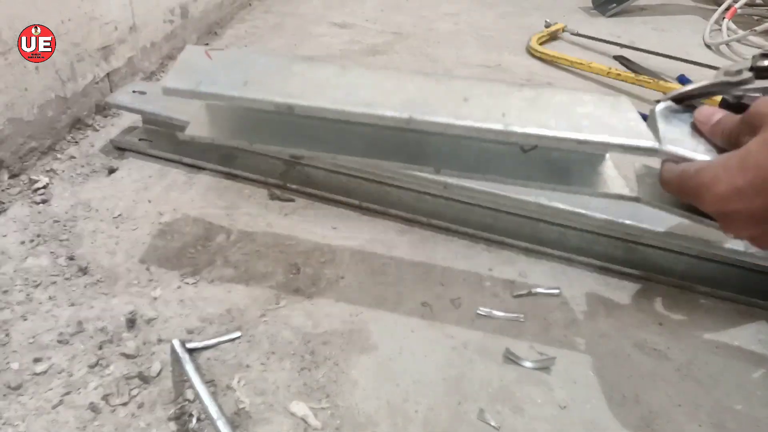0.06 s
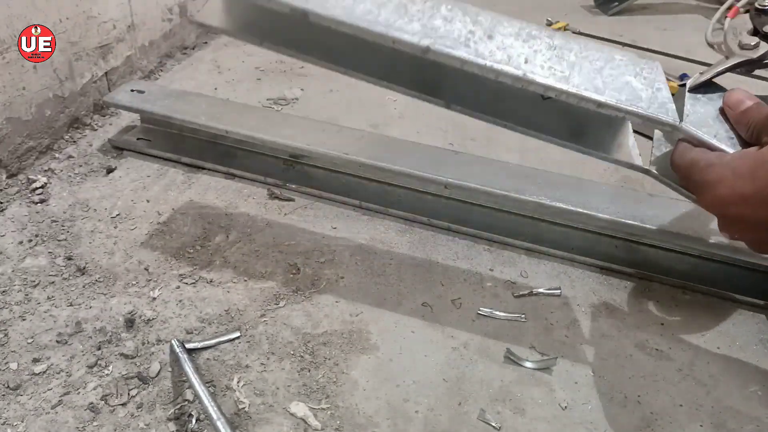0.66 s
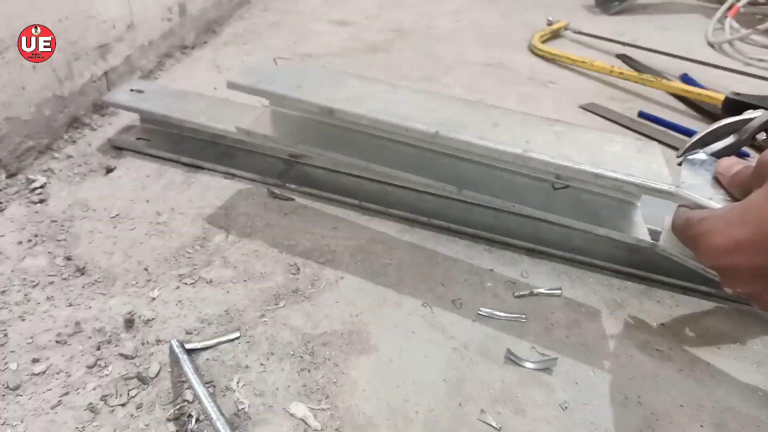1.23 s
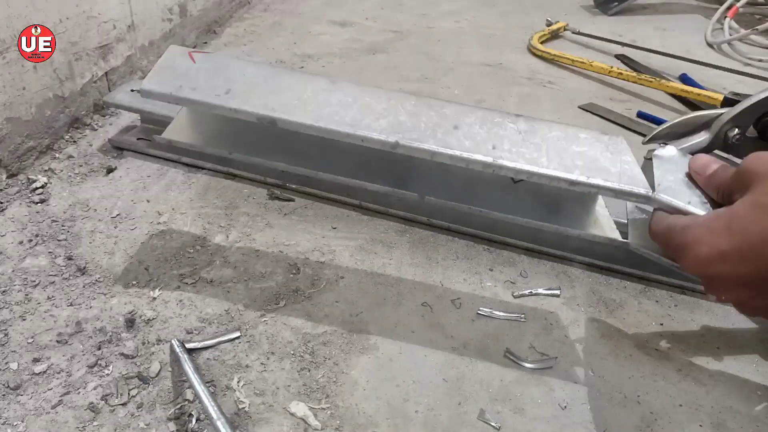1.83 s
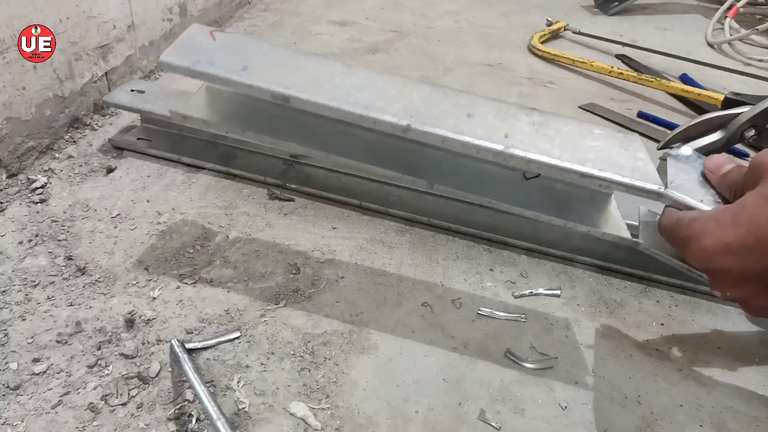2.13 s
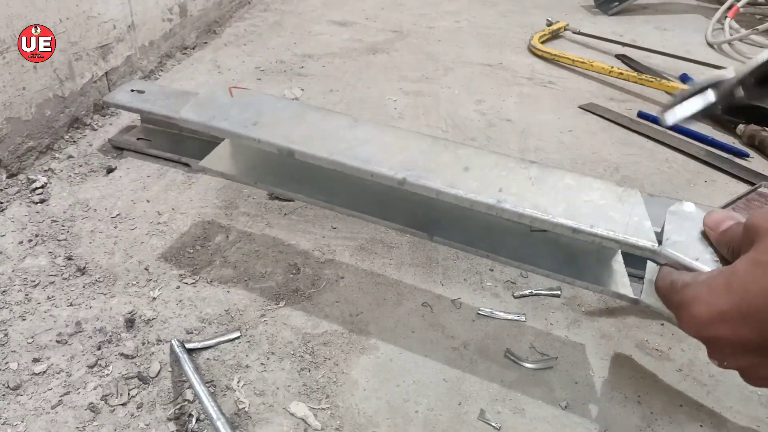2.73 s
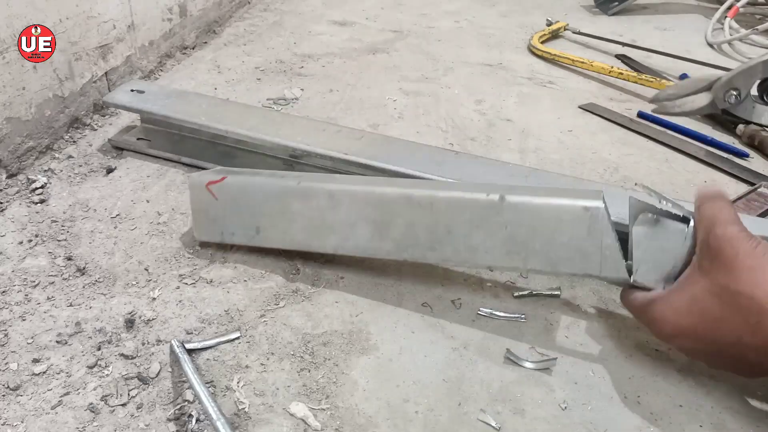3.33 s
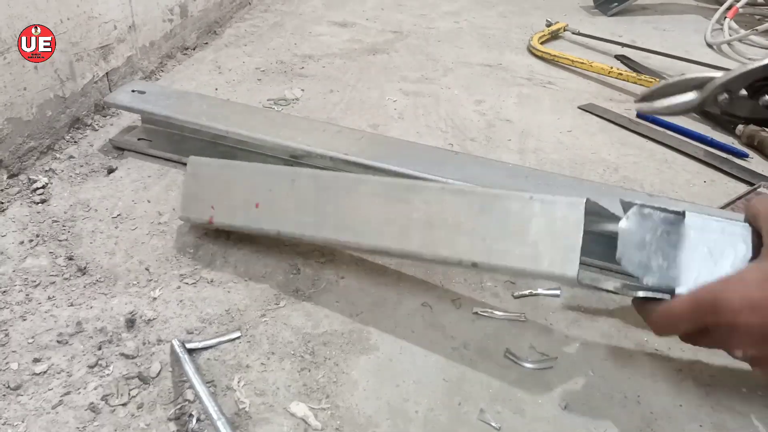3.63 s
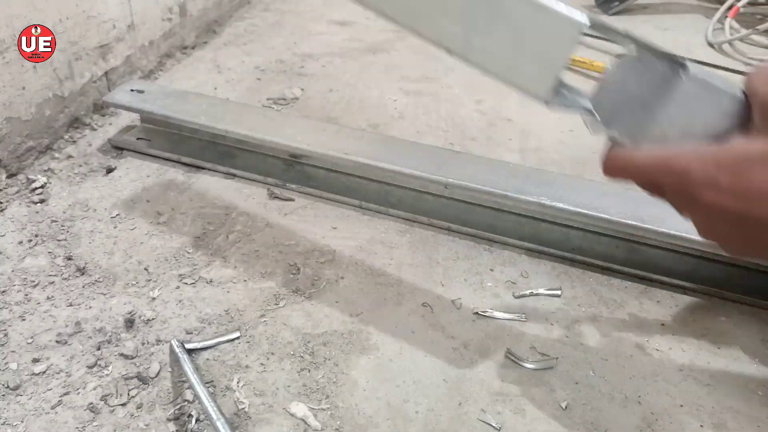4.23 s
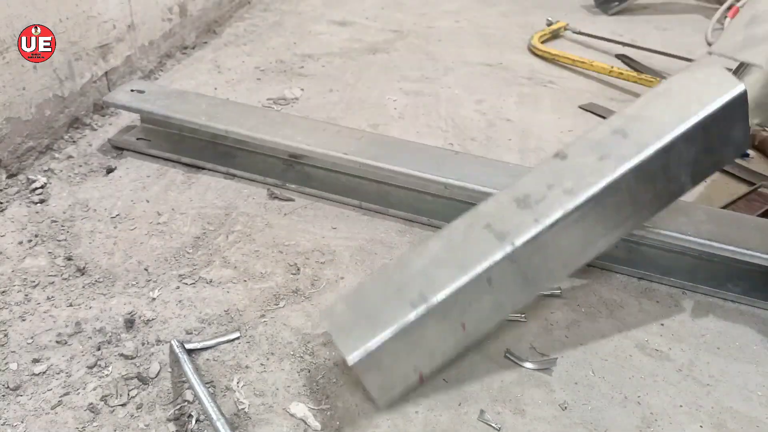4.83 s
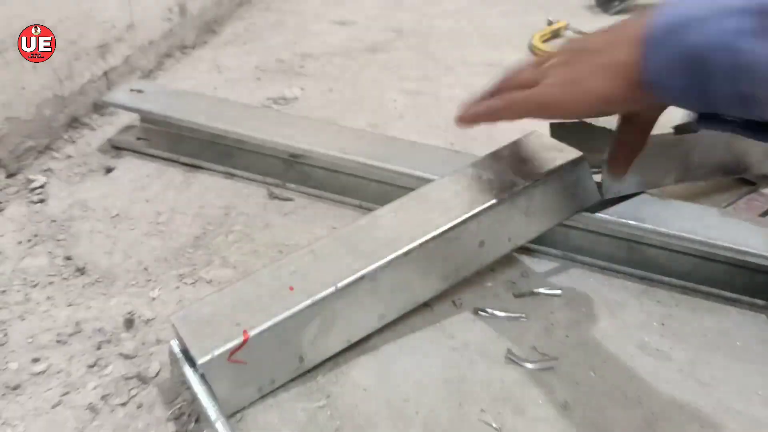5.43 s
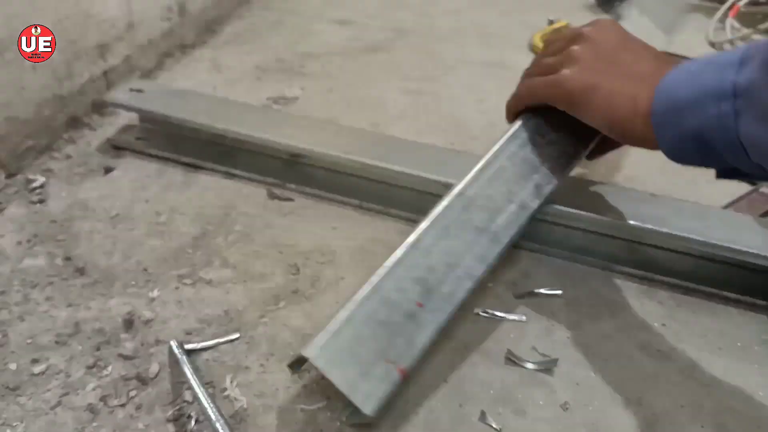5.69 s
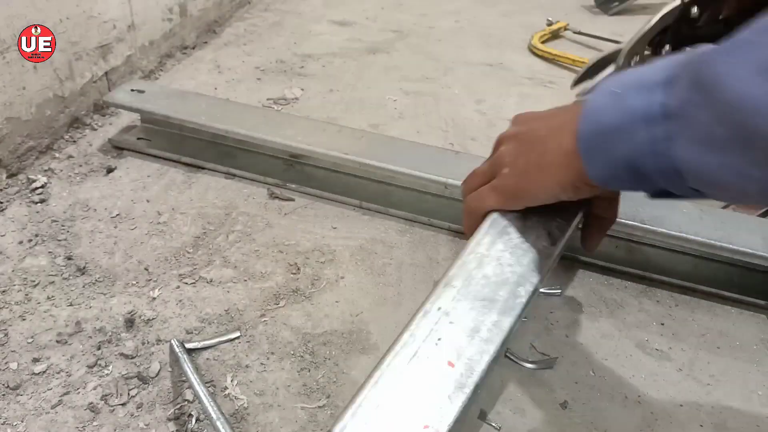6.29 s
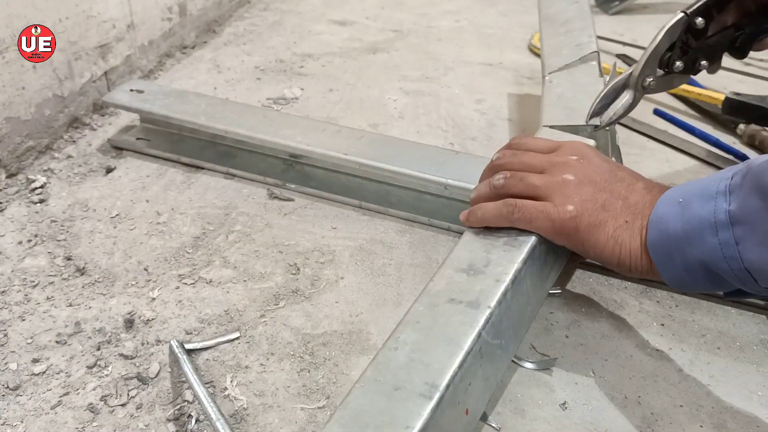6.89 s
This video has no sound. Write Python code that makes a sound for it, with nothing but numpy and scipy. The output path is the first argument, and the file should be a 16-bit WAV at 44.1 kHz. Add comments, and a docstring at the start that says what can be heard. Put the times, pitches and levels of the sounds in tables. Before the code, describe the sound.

A thin steel channel gives a few light taps, then tin snips graze, squeak and crunch into it in several squeezes, ending in a sharp snap. The snips tick faintly as they open. The channel is then turned and set down on a concrete floor with irregular ringing clanks and short gritty scrapes, busiest near the end. The microphone is close, in a bare, slightly reverberant room.

```python
"""Light metallic taps and a scrape: tin snips seek the cut on a galvanised steel channel.
The blades graze and squeal, creak by stick-slip friction and snap through the last bridge of steel.
The worker bends the cut end, turns the channel over, knocks it down and sets the snips to it again.
Each contact excites damped modes of the thin sheet or the jaws, and the bare concrete room
reverberates; a phone close by picks it up at two microphone ports."""
import sys
import numpy as np
from scipy import signal
from scipy.fft import rfft, irfft
from scipy.io import wavfile
from scipy.ndimage import map_coordinates

SR = 44100
rng = np.random.default_rng(int(sys.argv[2]) if len(sys.argv) > 2 else 0)


def to_wav(s):
    """Save 16-bit WAV."""
    ch = np.atleast_2d(s).T  # columns
    pcm = np.round(np.clip(ch, -1, 1) * 32767)  # PCM
    wavfile.write(sys.argv[1], SR, pcm.astype(np.int16))


N = 306495
TIME = np.arange(N) / SR
TAIL = np.arange(3 * 2 ** 13) / SR  # time axis of an impulse response [s]


def undb(db):
    """Amplitude ratio of a level in decibels."""
    return 10 ** (np.asarray(db) / 20)


def rms(x):
    """Root-mean-square amplitude."""
    return np.sqrt(np.mean(x ** 2)) + 1e-12


def unit(x):
    """Normalisation to unit mean energy per channel."""
    return x / (rms(x) * np.sqrt(x.shape[-1]))


def lookup(hz, points):
    """Interpolation of (frequency [Hz], value) points on a logarithmic axis."""
    f, value = np.transpose(points)
    return np.interp(np.log(np.maximum(hz, 1)), np.log(f), value)


def colour(x, points):
    """Minimum-phase filtering by a (frequency [Hz], gain [dB]) curve."""
    size = 2048
    gain = undb(lookup(np.fft.rfftfreq(size, 1 / SR), points))
    cepstrum = irfft(np.log(gain))
    cepstrum[1:size // 2] *= 2
    cepstrum[size // 2 + 1:] = 0
    return convolve(x, irfft(np.exp(rfft(cepstrum))))


def convolve(x, response):
    """Convolution with an impulse response, cut to the input length."""
    x = np.atleast_2d(x)
    return signal.fftconvolve(x, np.atleast_2d(response))[:, :x.shape[-1]]


def band(x, lo, hi):
    """Butterworth band-pass filtering."""
    return signal.sosfilt(signal.butter(N=4, Wn=[lo, hi], btype="band", fs=SR, output="sos"), x)


def resonate(x, peaks):
    """Forced response of parallel resonators of alternating sign."""
    return sum((-1) ** k * undb(db) * signal.lfilter(*signal.iirpeak(hz, hz / width, SR), x)
               for k, (hz, width, db) in enumerate(peaks))


def fade(t60):
    """Exponential decay by 60 dB in t60 seconds."""
    return np.exp(-np.log(1000) * TAIL / t60)


def add(out, s, x):
    """Superposition of x on out from time s."""
    i = max(int(s * SR), 0)
    out[..., i:i + x.shape[-1]] += x[..., :N - i]


def grains(size, rate, spread_db):
    """Shot noise: random micro-contacts of uneven strength, at a mean rate per second."""
    occurs = rng.random(size) < rate / SR
    return occurs * rng.standard_normal(size) * undb(spread_db * rng.standard_normal(size))


def flutter(rate_hz):
    """Random modulation: Gaussian values joined by straight lines."""
    knots = np.arange(0, TIME[-1] + 1, 1 / rate_hz)
    return np.interp(TIME, knots, rng.standard_normal(len(knots)))


def diffuse(size, coherent_hz=700):
    """Diffuse-field spectrum: coherence between the two ports falls with frequency."""
    hz = np.fft.rfftfreq(size, 1 / SR)
    mid, side = rfft(rng.standard_normal((2, size)))
    coherence = 0.96 / (1 + (hz / coherent_hz) ** 2)
    return hz, mid * np.sqrt(1 + coherence) + np.array([[1], [-1]]) * side * np.sqrt(1 - coherence)


def direct():
    """Direct sound: each port has its own travel time, a few samples long."""
    path = np.zeros((2, len(TAIL)))
    path[[0, 1], rng.integers(0, 16, 2)] = 1
    return path


def room(late_db, t60=0.4):
    """Late reverberation: reflections from the concrete build up, then decay exponentially."""
    reflections = rng.standard_normal((2, len(TAIL)))
    return undb(late_db) * unit(reflections * fade(t60) * (1 - fade(0.11)))


# Damping of sheet and room: (frequency [Hz], unscaled T60 [s])
DECAY_TIMES = [(100, .3), (300, .27), (700, .26), (1800, .25), (4800, .2), (12800, .17)]
def wash(t60_scale):
    """Modal overlap: dense modes merge into decaying noise, and the treble dies first."""
    hz, spectrum = diffuse(len(TAIL))
    octave = np.clip(np.log2(np.maximum(hz, 1) / 125), 0, 7)
    bands = [irfft(spectrum * np.maximum(1 - abs(octave - k), 0), len(TAIL)) for k in range(8)]
    return sum(x * fade(t60_scale * lookup(125 * 2 ** k, DECAY_TIMES)) for k, x in enumerate(bands))


def spread(x, wet_db):
    """Multipath propagation: rubbing arrives directly and by way of sheet and room."""
    y = convolve(x, unit(direct() + undb(wet_db) * unit(wash(0.22)) + room(-28)))
    return y * rms(x) / rms(y.mean(axis=0))


# Bending modes of the channel: (frequency [Hz], relative level [dB], T60 [s])
CHANNEL_MODES = [(141, -4, .3), (237, -8, .25), (366, -6, .26), (474, -2, .28), (540, -3, .25),
                 (1035, -3.5, .44), (1177, -5, .22), (1320, -3, .31), (1390, -7, .22), (1530, -12, .55),
                 (1658, -2, .22), (1763, -1, .24), (1877, 0, .24), (1955, 1, .25), (2138, -3, .22),
                 (2326, -3, .25), (2466, -6, .25), (2710, -10, .3), (4081, -11, .2), (4204, -11, .2),
                 (4850, -11, .18), (5141, -10, .2)]
def ringing(favoured_hz, boost_db, held, sustain):
    """Modal superposition: the spot struck favours some modes, and the floor damps the longest."""
    hz, db, t60 = np.transpose(CHANNEL_MODES)[:, :, None]
    t60 = t60 if held else np.minimum(t60, .35)
    favoured = np.exp(-((hz - favoured_hz) / 45) ** 2)
    t60 = t60 * (1 + sustain * favoured)  # a mode with nodes under the fingers rings longer
    detuned_hz = hz * (1 + .006 * rng.standard_normal(hz.shape))  # the grip varies between blows
    partials = undb(db) * fade(t60) * np.exp(2j * np.pi * detuned_hz * TAIL)
    partials *= np.sqrt(2 / np.sum(abs(partials) ** 2))
    strength = undb(-7 + boost_db * favoured + 2 * rng.standard_normal(hz.shape))
    phases = rng.uniform(0, 2 * np.pi, len(hz))
    # short waves reach the two ports out of step
    phases = phases + rng.standard_normal((2, len(hz))) * np.minimum(hz.T / 1400, 1.4)
    return ((strength.T * np.exp(1j * phases)) @ partials).imag


# Spectral envelope of the sheet's many weaker modes: (frequency [Hz], relative level [dB])
SHEET_SPECTRUM = [(60, -15), (105, -3), (150, 1), (230, -0.5), (330, -2.5), (520, 11.5), (790, -3),
                  (1050, 0), (1850, 4), (2450, -4.5), (3100, -10), (4500, -6.5), (6500, -16), (8200, -14),
                  (10000, -17.5), (15000, -20)]
def sheet(favoured_hz, ripple_db=2.0, lift_db=6):
    """Spectral shaping: a random treble ripple and a lift near the favoured pitch colour each blow."""
    hz = np.r_[60:1000:45, 1000:16000:130]
    ripple = ripple_db * np.minimum(hz / 2500, 1) * rng.standard_normal(len(hz))
    lift = lift_db * np.exp(-((hz - favoured_hz) / min(170, 0.3 * favoured_hz)) ** 2)
    response = unit(wash(0.84)) + undb(-7.5) * direct() + room(-17.5)
    return unit(colour(response, np.c_[hz, lookup(hz, SHEET_SPECTRUM) + ripple + lift]))


# Bands of clang, thump, flex, edge and sizzle: (lower limit [Hz], upper limit [Hz])
IMPACT_BANDS = [(850, 2800), (45, 300), (300, 850), (2800, 6500), (6500, 16000)]
# Thump, flex, edge and sizzle: (level re clang [dB], weight slope [dB/dB], sharpness slope [dB/dB])
IMPACT_BALANCE = [(-18.5, 1.0, 0), (-12.5, 0.478, 0), (-6.5, 0, 1.0), (-9.5, 0, 1.75)]
def impact(clang_db, weight_db, sharpness_db, favoured_hz, boost_db, rattle_s, held, sustain=0.19):
    """Impact excitation: heavy landings drive the low modes, hard corners the high ones."""
    modes = ringing(favoured_hz, boost_db, held, sustain)
    response = modes + sheet(favoured_hz)
    chatter = grains(len(TAIL), 700, 2.3) * np.exp(-(TAIL / rattle_s) ** 2 / 2)
    contacts = undb(1) * np.sqrt(rattle_s / 0.018) * unit(chatter)
    contacts[0] += 1  # the blow itself
    fade_in = 1 - .75 * np.exp(-TAIL / 0.00068)  # a very short fade-in softens the attack
    blow = convolve(response, contacts) * fade_in
    parts = [band(blow, lo, hi) for lo, hi in IMPACT_BANDS]
    balance = [db + heavy * weight_db + sharp * sharpness_db for db, heavy, sharp in IMPACT_BALANCE]
    attack = int(.03 * SR)
    return sum(p * undb(clang_db + db) / rms(p[:, :attack]) for p, db in zip(parts, [0, *balance]))


# Taps of the snips as they seek the cut: (time [s], relative level [dB])
SEEKING_TAPS = [(0.001, -40.5), (0.038, -38), (0.103, -40.5), (0.276, -44.5), (0.382, -53.5), (0.454, -52),
                (0.535, -52)]
def taps(gain_db=2.5):
    """Free vibration: light impacts set the hand-held channel ringing, with little bass."""
    out = np.zeros((2, N))
    for s, db in SEEKING_TAPS:
        add(out, s, impact(db + gain_db, weight_db=-25.5, sharpness_db=-4, favoured_hz=1940,
                           boost_db=13, rattle_s=0.0042, held=True, sustain=0))
    return out


def stroke(s, length_s, rise_s, sag_db, release_t60, rise_db=19.5):
    """Amplitude envelope of a hand movement: swell, sag (growth if negative), exponential release."""
    age = TIME - s
    db = -rise_db * np.clip(1 - age / rise_s, 0, 1) - sag_db * np.clip(age / length_s, 0, 1)
    release = np.exp(-np.log(1000) * np.clip((age - length_s) / release_t60, 0, 10))
    return (age >= 0) * undb(db) * release


# Drags of the channel along its neighbour, the floor and the hand:
# (time [s], duration [s], relative body level [dB], relative grit level [dB], sag [dB])
DRAG_STROKES = [(0.0, 0.26, -51, -63.5, -11), (3.256, 0.12, -39.5, -40.5, -6.5),
                (3.507, 0.23, -49.5, -40.5, -6), (4.413, 0.039, -43, -57, 1.5),
                (4.559, 0.15, -68.5, -59, 0.5), (5.091, 0.3, -45, -47.5, -6), (5.37, 0.1, -38, -37, -9),
                (5.88, 0.2, -48.5, -48.5, -7.5), (6.171, 0.076, -31.5, -34.5, 1),
                (6.315, 0.134, -31, -32.5, 1)]
def drags(catch_db=4):
    """Roughness excitation: sliding edges catch on grit, stall and slip, and shiver the sheet."""
    shiver = resonate(grains(N, 1000, 9.4), [(hz, 45, db) for hz, db, _ in CHANNEL_MODES])
    body, shudder = band(shiver, 900, 6100), band(shiver, 110, 990)
    body = undb(-1) * body / rms(body)
    grit = band(colour(grains(N, 1500, 4.2), SHEET_SPECTRUM), 3000, 20000)
    grit = undb(-4) * grit / rms(grit) + undb(-8) * shudder / rms(shudder)
    sliding = np.zeros((1, N))
    for s, length_s, body_db, grit_db, sag_db in DRAG_STROKES:
        envelope = stroke(s, length_s, rise_s=.012, sag_db=sag_db, release_t60=0.18)
        sliding += envelope * (undb(body_db) * body + undb(grit_db) * grit)
    catching = undb(catch_db * flutter(60))
    return spread(sliding * catching / rms(catching), wet_db=3.5)


# Background noise of the building: (frequency [Hz], relative level [dB])
RUMBLE_SPECTRUM = [(12, -26), (20, -6.5), (43, -3.5), (87, -14.5), (160, -9.5), (286, -18), (398, -10),
                   (470, -22), (525, -11), (753, -23), (1930, -28.5), (15000, -44)]
def rumble(level_db=-69):
    """Diffuse noise field: the building rumbles faintly and steadily."""
    hz, spectrum = diffuse(N)
    noise = irfft(spectrum * undb(lookup(hz, RUMBLE_SPECTRUM)), N)
    return noise * undb(level_db) / rms(noise.mean(axis=0))


# Tuning of the jaws: (time [s], frequency factor [1])
JAW_TUNING = [(.59, .99), (1.15, 1.005), (1.4, 1.04), (1.85, .94), (2.1, .95), (2.36, 1.005), (2.43, 1.035),
              (2.68, 1.03)]
def tuning(s):
    """Resonance follows stiffness: the jaws stiffen as they close and slacken as they reopen."""
    return np.interp(s, *np.transpose(JAW_TUNING))


def friction(peaks, rate, spread_db, push=1):
    """Frictional excitation: micro-slips, weighted by the push, ring the jaws' gliding resonances."""
    size = N + N // 2
    rung = resonate(grains(size, rate, spread_db) * np.resize(push, size), peaks)
    gliding = map_coordinates(rung, [np.cumsum(tuning(TIME))], order=3)
    return gliding / rms(gliding)


# Squeezes of the snips: (time [s], duration [s], rise [s], relative level [dB], sag [dB],
# slide before the bite [s], relative squeal level [dB])
HAND_SQUEEZES = [(0.586, 0.21, 0.018, -46.5, -5.5, 0.15, -11), (0.965, 0.25, 0.014, -39.5, 5, .001, -9.5),
                 (1.595, 0.06, 0.0066, -47.5, -2, 0.2, -4), (1.713, 0.08, .005, -43.5, 10, 0.16, -8),
                 (2.092, 0.62, 0.085, -41.5, 1.5, 0.32, 0)]
def squeezes(bite_s=0.012):
    """Envelopes of slide, squeal and shear: sliding friction yields to shearing as the blades bite."""
    slide, squeal, shear = np.zeros((3, N))
    for s, length_s, rise_s, db, sag_db, slide_s, squeal_db in HAND_SQUEEZES:
        force = undb(db) * stroke(s, length_s, rise_s, sag_db, release_t60=0.11)
        bite = .5 + .5 * np.tanh((TIME - s - slide_s) / (2 * bite_s))
        slide += force * (1 - bite)
        squeal += force * (1 - bite) * undb(squeal_db)
        shear += force * bite
    return slide, squeal, shear


def creak(rate_hz=85, jitter=.25, slip_s=0.0025, scatter_db=1.5, stuck_db=-10):
    """Stick-slip motion: the loaded blades advance in quick uneven jerks."""
    cycles = np.cumsum(rate_hz * np.exp(jitter * flutter(40))) / SR
    strength = undb(scatter_db * rng.standard_normal(4096)).take(cycles.astype(int), mode="wrap")
    age = cycles % 1 / rate_hz / slip_s
    push = undb(stuck_db) + strength * age * np.exp(1 - age)
    return push / rms(push)


# Jaw resonances when sliding and under load: (frequency [Hz], bandwidth [Hz], gain [dB])
SLIDING_JAWS = [(1480, 37, -0.5), (2200, 350, -1), (3100, 150, 0), (3980, 400, 4), (5430, 620, -0.5),
                (8050, 290, -7), (12000, 2000, -33)]
LOADED_JAWS = [(2583, 160, -1.5), (3405, 550, -10), (4294, 200, 5.5), (5825, 230, -1.5), (8250, 2000, -15),
               (13270, 1900, -21)]
def blades(squeal_hz=4030, waver=0.011, catch_db=3.5):
    """Friction-induced vibration: the blades graze and squeal, rasp into the zinc, then shear."""
    slide, sing, shear = squeezes()
    jerks = creak()
    tearing = undb(-0.5) * shear * friction(LOADED_JAWS, rate=3300, spread_db=2.3, push=jerks)
    grazing = undb(catch_db * flutter(70)) * slide * friction(SLIDING_JAWS, rate=4000, spread_db=4.3)
    pitch_hz = squeal_hz * (1 + waver * flutter(220))
    tone = np.sqrt(2) * np.sin(2 * np.pi * np.cumsum(pitch_hz) / SR)
    squeal = undb(-4 + catch_db * flutter(46)) * sing * tone
    zinc = band(grains(N, 3000, 4), 7500, 15000)
    entry = np.sqrt(slide * shear)  # the zinc rasps most as the edges dig in
    rasp = (undb(-17) * shear * jerks + undb(-25) * slide + undb(-4) * entry) * zinc / rms(zinc)
    return spread(band(tearing + grazing + squeal + rasp, 800, 17000), wet_db=-3)


# Knocks of the channel on the snips, its neighbour and the floor: (time [s], relative clang level [dB],
# weight [dB], sharpness [dB], favoured frequency [Hz], boost there [dB], rattle time [s])
CHANNEL_KNOCKS = [(0.667, -48.5, -32, 2.5, 1400, 21, .008), (1.19, -50, 1, 3, 2110, 2, 0.0075),
                  (1.722, -56, 5, -3, 1530, -1, 0.019), (2.683, -34, -12, 10, 1035, 9.5, 0.012),
                  (3.303, -34.5, -1, 2.5, 2160, 11, 0.0082), (3.373, -25.5, -6, -2.5, 1060, -1.5, 0.0045),
                  (3.54, -34, 11, 4.5, 2080, 10.5, 0.012), (3.632, -27, -2, 6, 1316, 16, 0.0079),
                  (3.65, -21, 0, -31, 1035, -10.5, 0.0061), (3.758, -33.5, -12, 3.5, 1830, 10, 0.0046),
                  (3.914, -52, -64, -2, 1460, -2, 0.0025), (4.346, -30.5, 0, 4, 1919, 15, 0.019),
                  (4.37, -39, 14, 6, 370, 9, 0.0041), (4.443, -49, 10.5, -0.5, 360, 3, 0.0036),
                  (4.921, -30, -11, 0, 1814, 14.5, 0.0046), (5.054, -35.5, 14, 2, 142, 6, 0.0049),
                  (5.122, -44.5, -32, 7.5, 2280, 24, 0.026), (5.236, -27.5, 10, -14, 556, 28, 0.0061),
                  (5.25, -25.5, 3, -3, 1090, 12, 0.0028), (5.286, -30.5, 4.5, -2.5, 1490, 4, 0.014),
                  (5.391, -16, 0.5, -0.5, 1840, 6, 0.01), (5.451, -19, 14, -2.5, 484, 3, 0.0037),
                  (5.484, -35.5, 33, 3, 366, 15.5, 0.0081), (5.525, -49.5, 37, -11, 237, 11, .012),
                  (5.583, -30.5, 8, 3, 237, -8, 0.0025), (5.726, -25.5, -3, -10.5, 1349, 19.5, 0.0038),
                  (5.841, -34.5, -9, -5.5, 2175, 14, 0.0061), (5.885, -51, 29, 6, 150, 5, 0.0015),
                  (6.03, -23, -10, -4, 1897, 5, 0.021), (6.093, -18, -5.5, 2.5, 2470, 5, 0.021),
                  (6.143, -22, -3.5, 4, 1714, 5, 0.029), (6.265, -34.5, 3.5, -1, 2120, 14, 0.0036),
                  (6.347, -24.5, 5, 0, 1545, 4, 0.015), (6.417, -28, -3, -7, 1335, -3, 0.042),
                  (6.575, -25.5, -6.5, -0.5, 2020, -1, 0.015), (6.73, -29.5, -6.5, 1.5, 1660, -1, 0.0031),
                  (6.87, -41, -9.5, -5, 1260, 0, 0.006)]
def knocks(gain_db=0.37, landing_s=4.9):
    """Impacts and contact damping: the channel rings in the hand, then more briefly on the floor."""
    out = np.zeros((2, N))
    for s, db, weight_db, sharpness_db, favoured_hz, boost_db, rattle_s in CHANNEL_KNOCKS:
        add(out, s, impact(db + gain_db, weight_db, sharpness_db, favoured_hz, boost_db,
                           max(rattle_s, .002), held=s < landing_s))
    return out


def clicks(events, body, burst_s, wet_db, t60_scale):
    """Transient excitation: each brief noise burst rings the sheet and the filter body(x, time)."""
    out = np.zeros((2, N))
    size = len(TAIL) // 2
    tail = undb(wet_db) * unit(wash(t60_scale))
    for s, db in events:
        burst = rng.standard_normal(size) * np.exp(-TAIL[:size] / burst_s)
        click = body(convolve((direct() + tail)[:, :size], burst), s)
        add(out, s, click * undb(db) / abs(click.mean(axis=0)).max())
    return out


# Large slips of the shearing blades: (time [s], relative peak level [dB])
BLADE_SLIPS = [(0.8475, -28.5), (0.8736, -40), (0.8852, -25), (1.258, -24), (1.2754, -20.5),
               (1.3122, -25.5), (1.3498, -18), (1.3674, -32), (1.4055, -21.5), (2.4384, -16.5),
               (2.4805, -13), (2.5507, -13), (2.6306, -18)]
def slips():
    """Stick-slip release: each large slip rings the loaded jaws at their present tuning."""
    def jaws(x, s):
        peaks = [(hz * tuning(s), width, db) for hz, width, db in LOADED_JAWS]
        return band(resonate(x, peaks), 1400, 22000)
    return undb(-9.5) * clicks(BLADE_SLIPS, jaws, burst_s=0.0023, wet_db=-1, t60_scale=0.73)


# Cracks in the last bridge of steel: (time [s], relative peak level [dB])
BRIDGE_CRACKS = [(2.6803, -23), (2.6829, -17.5), (2.6846, -6), (2.6874, -12.5)]
# Spectrum of a crack: (frequency [Hz], relative level [dB])
CRACK_SPECTRUM = [(100, -16.5), (800, -14.5), (1500, -0.5), (4000, 0.5), (8000, -8.5), (10500, -16.5),
                  (15000, -18)]
def fracture():
    """Acoustic emission: the last bridge of steel breaks in a rapid run of broadband bursts."""
    steel = lambda x, s: colour(x, CRACK_SPECTRUM)
    return undb(3.5) * clicks(BRIDGE_CRACKS, steel, burst_s=0.0014, wet_db=-4.5, t60_scale=1.0)


# Ticks of the pivot: (time [s], relative peak level [dB])
PIVOT_TICKS = [(2.8814, -40.5), (2.9462, -33.5), (2.9925, -40.5), (3.014, -34.5), (3.045, -51),
               (3.0686, -45), (3.2457, -43.5), (4.4787, -39.5)]
# Resonances of the hinge: (frequency [Hz], bandwidth [Hz], gain [dB])
HINGE_MODES = [(2640, 280, 2.5), (3490, 230, 19), (4370, 65, 7.3), (7700, 140, 9.4)]
def pivot():
    """Impulse-excited resonance: the pivot ticks as the jaws open."""
    hinge = lambda x, s: band(resonate(x, HINGE_MODES), 1800, 14700)
    return undb(-1) * clicks(PIVOT_TICKS, hinge, burst_s=0.00067, wet_db=0.5, t60_scale=0.76)


def scene():
    """Linear superposition of blows, cutting and dragging over the quiet room."""
    blows = taps() + knocks()
    snips = blades() + slips() + pivot() + fracture()
    return blows + snips + drags() + rumble()


# Imbalance of the microphone ports: (frequency [Hz], left minus right level [dB])
PORT_IMBALANCE = [(60, 2.5), (110, -3.5), (200, 5), (380, 0.5), (700, 0), (1290, -1), (2380, 1.5),
                  (4400, 1.5), (8120, -5.5), (15000, 2.5)]
def record(dry, drive=1.15, top_hz=15600):
    """Transduction: each port colours the sound, saturation rounds peaks, a low-pass cuts the top."""
    ports = np.vstack([colour(x, [(hz, sign * db / 2) for hz, db in PORT_IMBALANCE])
                       for x, sign in zip(dry, (1, -1))])
    low_pass = signal.ellip(10, .2, 80, top_hz, fs=SR, output="sos")
    return signal.sosfilt(low_pass, np.tanh(drive * ports) / drive)


dry = scene()
out = record(dry)
to_wav(out)
```